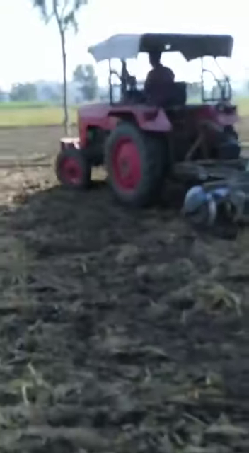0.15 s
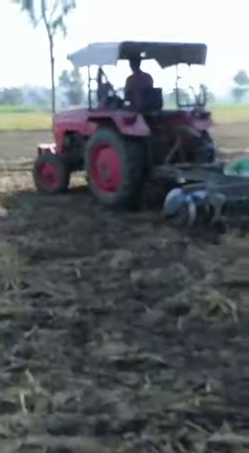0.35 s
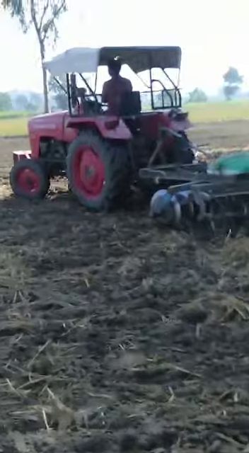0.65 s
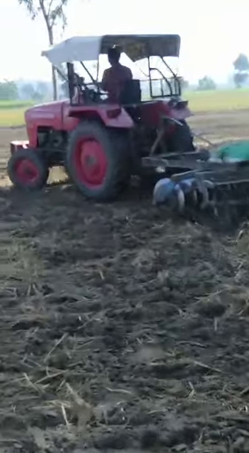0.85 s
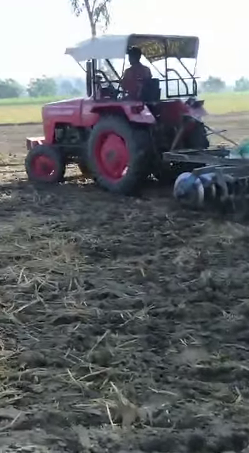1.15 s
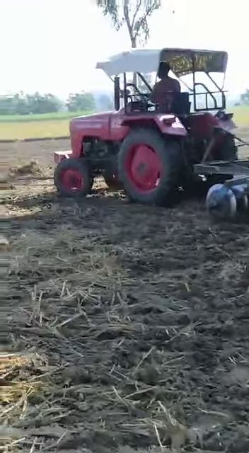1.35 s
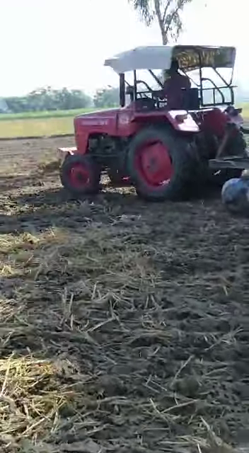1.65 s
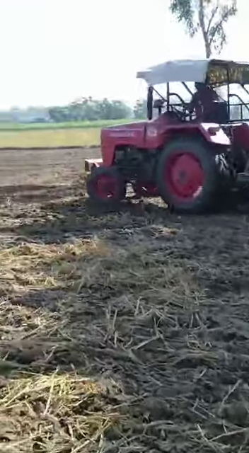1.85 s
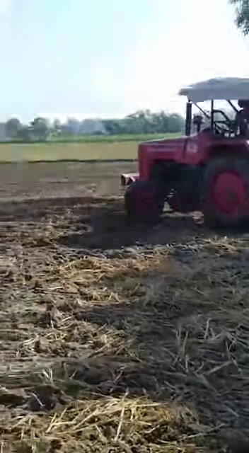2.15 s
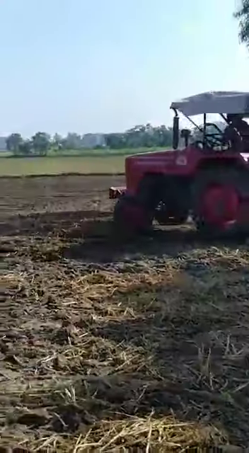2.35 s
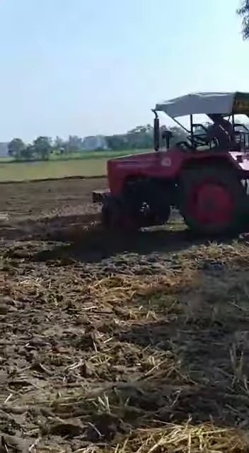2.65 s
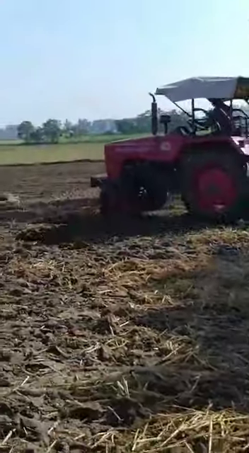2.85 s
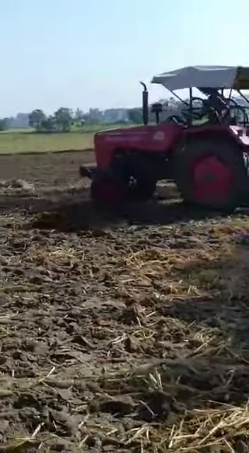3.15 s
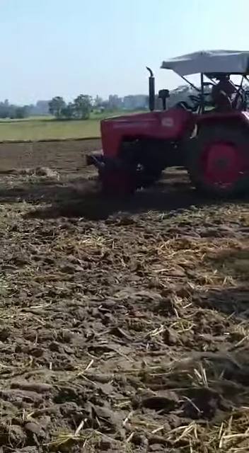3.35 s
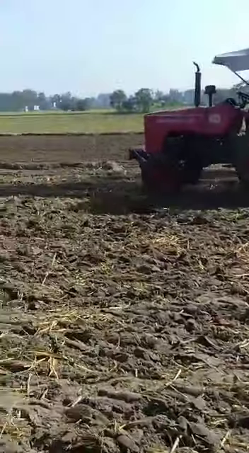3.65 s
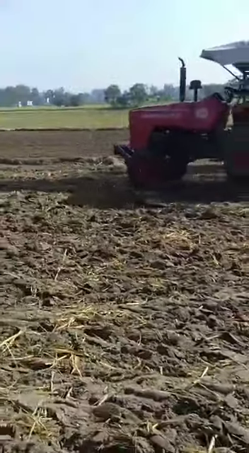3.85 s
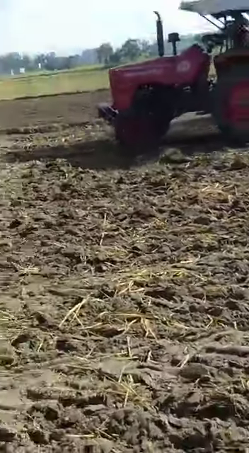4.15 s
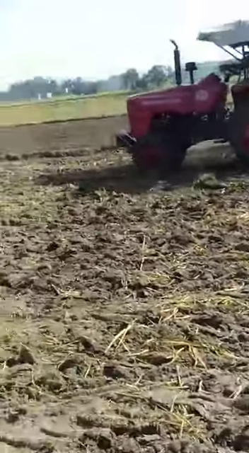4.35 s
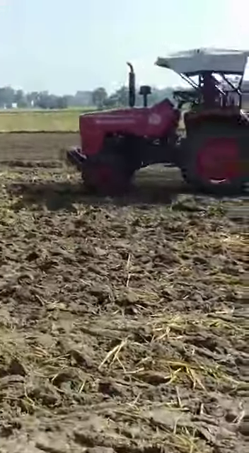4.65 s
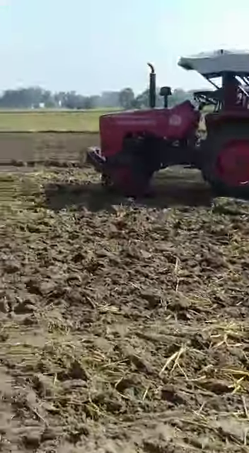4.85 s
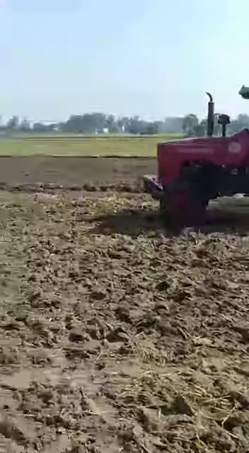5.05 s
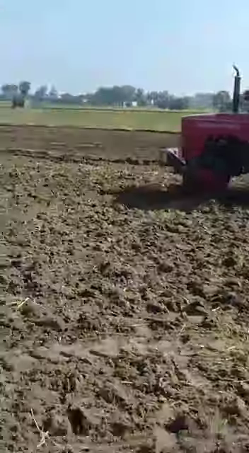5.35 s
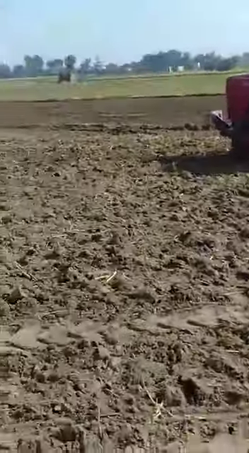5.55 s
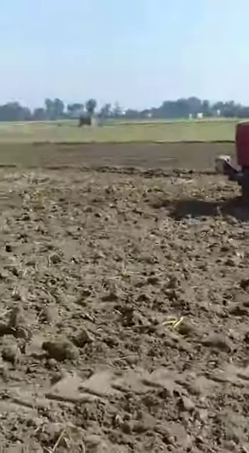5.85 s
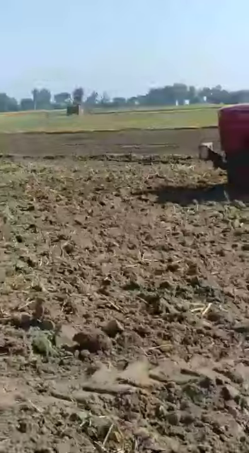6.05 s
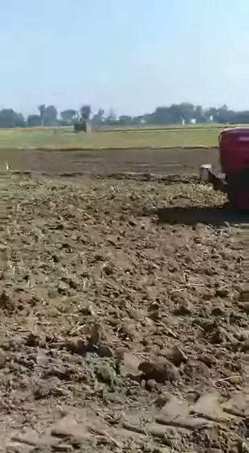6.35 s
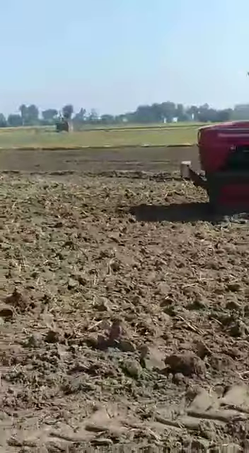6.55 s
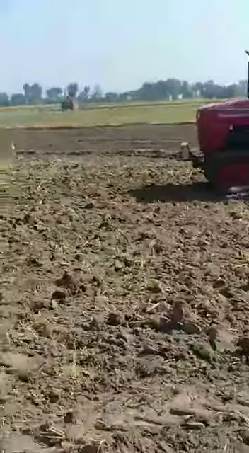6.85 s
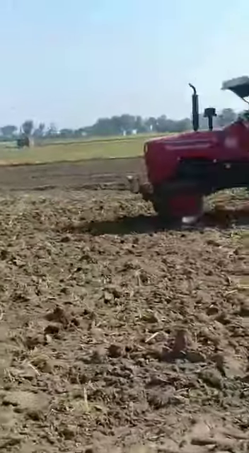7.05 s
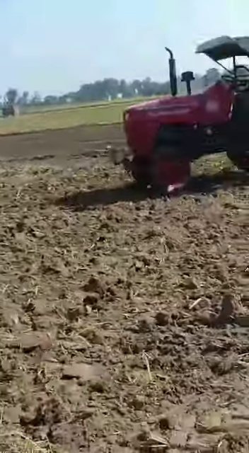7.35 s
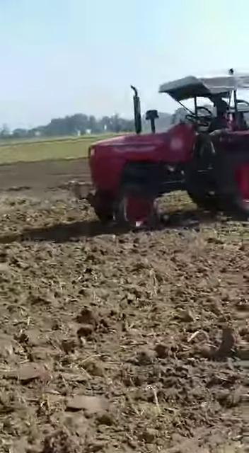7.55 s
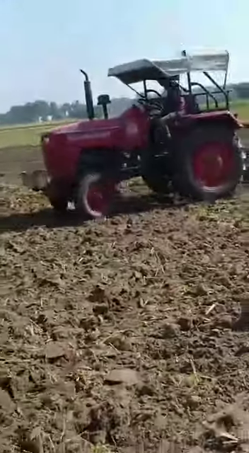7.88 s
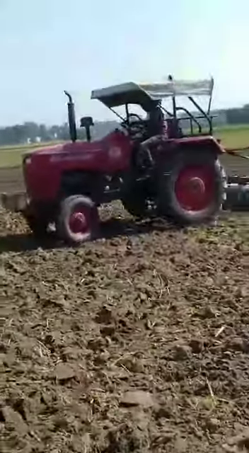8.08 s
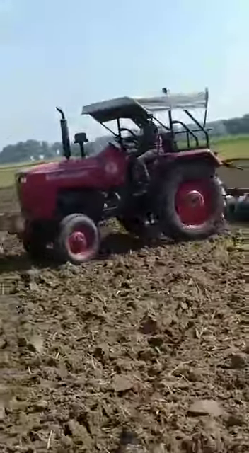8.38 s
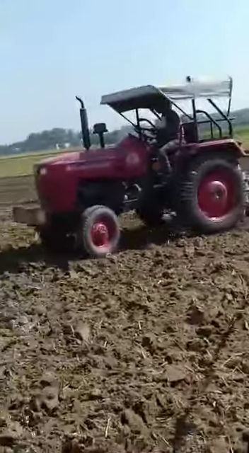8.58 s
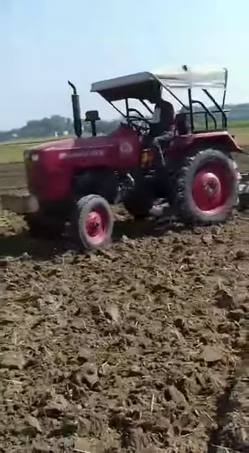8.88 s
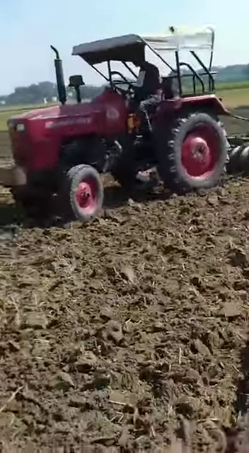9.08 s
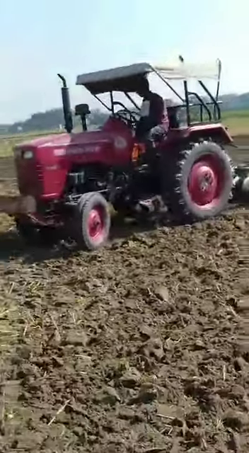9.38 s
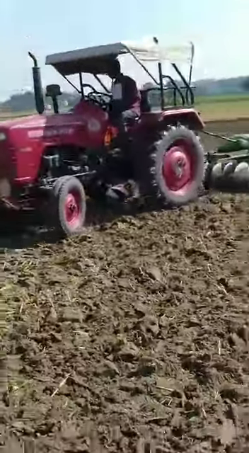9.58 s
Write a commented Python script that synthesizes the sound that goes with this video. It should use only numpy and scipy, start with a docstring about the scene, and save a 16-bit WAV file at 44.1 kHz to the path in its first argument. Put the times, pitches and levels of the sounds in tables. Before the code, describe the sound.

The even chugging and knocking of a tractor's diesel engine fills an open field, with ticking, ringing panels and a whine that comes and goes. In the first three seconds a towed harrow scrapes through the earth and clinks once. Past the middle, an airy hiss swells and a soft gust bumps the microphone, then the tractor gets louder as it draws near.

```python
"""A throbbing, knocking diesel tractor slowly comes closer, dragging a disc harrow over a tilled field.
Four cylinders fire in turn: the exhaust hums and puffs, the block knocks, its panels ring, injectors tick.
The timing gear whines, the fan hums and hisses, and narrow bands of the rattle swell and fade.
An echo off the soil combs the block and the ticking as the tractor moves; a thin hiss sits at the very top.
Early on the discs rasp and clink; light wind touches the microphone."""
import sys
import numpy as np
from scipy import signal
from scipy.fft import rfft, irfft
from scipy.io import wavfile

SR = 44100
rng = np.random.default_rng(int(sys.argv[2]) if len(sys.argv) > 2 else 0)


def unload_audio(sound):
    """Save the sound as a 16-bit wav file, at the path given as the first command line argument."""
    columns = np.transpose(np.atleast_2d(sound))
    # keep every value between -1 and 1, then stretch to whole-number steps
    steps = np.round(np.clip(columns, -1, 1) * 32767)
    wavfile.write(sys.argv[1], SR, steps.astype(np.int16))


N = 428652
TIME = np.arange(N) / SR
FREQS = np.arange(N // 2 + 1) * SR / N
# treble faders: (time [s], injector tick [dB], top hiss [dB])
TREBLE_LEVELS = [(0, -39.5, -48), (1.2, -38.5, -44.5), (1.7, -39.5, -48), (2.8, -37, -48), (3.45, -36, -46),
                 (4.2, -39.5, -49), (5.0, -37.5, -48.5), (5.65, -43, -47), (6.2, -42.5, -46),
                 (6.9, -41, -46.5), (7.4, -39, -49.5), (8.0, -34.5, -44.5), (8.7, -34, -46),
                 (9.3, -33.5, -41), (9.72, -32.5, -41)]


def engine_block(cycle):
    """Every firing shakes a growl from the block, knocks in the head and rings the panels."""
    # the block's fader: (time [s], level [dB], knock against the block [dB])
    levels = [(0.0, -25.5, -3), (1.0, -25.5, -4), (1.9, -25, -4.5), (2.15, -26, -5.5), (2.7, -24, -5),
              (3.4, -24.5, -5), (4.2, -25.5, -3), (5.2, -24.5, -4.5), (5.6, -26, -4.7), (6.5, -24, -6.5),
              (7.1, -25.5, -4), (8.0, -23.5, -3.5), (8.95, -22.5, -3), (9.3, -18.5, -4), (9.72, -20, -4.5)]
    # midrange growl: (frequency [Hz], relative level [dB])
    growl_eq = [(260, -12.5), (380, -7.5), (470, -2.5), (560, -3.5), (700, -1.5), (850, -2.1), (1080, -4),
                (1300, -3.5), (1550, -8), (1800, -42)]
    # hard, bright knock: (frequency [Hz], relative level [dB])
    knock_eq = [(1350.0, -27), (1650.0, -7), (1900.0, -2.5), (2250.0, -0.2), (2500.0, 0.2), (2750.0, -2),
                (3000.0, -3.6), (3250.0, -10.5), (3700.0, -43.2)]
    block_db, knock_db = in_time(levels)
    growl_db = -5.5  # against the block
    blows = firing_blows(cycle, decay=0.15, rise=0.018, uneven_db=1.0)
    growl = rattle(cycle, repeat=0.36, slack=0.00035) * pulsing(cycle, blows, base=2.2, lope=.1)
    knock = rattle(cycle, repeat=0.42, slack=0.00022) * pulsing(cycle, blows, base=.85)
    knock *= from_db(1.24 * drift(440))
    ring = panels(rattle(cycle, repeat=0.5, slack=0.000098)) * pulsing(cycle, blows, base=2.4)
    body = from_db(growl_db) * coloured(growl, growl_eq) + from_db(knock_db) * coloured(knock, knock_eq)
    return from_db(block_db) * over_soil(body + ring, echo=1.04, dull_hz=2220)


def panels(drive):
    """Bonnet, sump, side plates and rocker cover ring, each radiating best to the side it faces."""
    # panel resonances: (pitch [Hz], width [Hz], level against the block from each of six sides [dB])
    modes = [(435.0, 70.0, -12.0, -17.0, -30.0, -30.0, -17.0, -10.0),
             (592.0, 84.0, -13.0, -19.5, -11.0, -12.0, -16.0, -18.5),
             (699.0, 79.0, -19.0, -15.0, -12.0, -17.0, -14.0, -17.5),
             (778.0, 92.0, -15.5, -14.5, -10.0, -14.5, -17.5, -22.0),
             (905.0, 109.0, -14.0, -13.0, -13.0, -8.5, -15.5, -21.0),
             (1036.0, 102.0, -25.0, -18.0, -13.5, -9.5, -14.5, -19.5),
             (1135.0, 88.0, -19.5, -14.0, -12.5, -8.5, -16.0, -16.0),
             (1230.0, 100.0, -14.0, -14.0, -16.5, -16.5, -18.5, -17.0),
             (1353.0, 97.0, -10.0, -11.0, -17.5, -17.5, -22.0, -16.0),
             (1460.0, 100.0, -12.5, -19.5, -16.5, -16.0, -21.0, -18.5),
             (1594.0, 105.0, -16.5, -14.5, -13.0, -20.5, -23.0, -17.0),
             (1746.0, 128.0, -11.0, -12.5, -15.5, -17.0, -21.5, -13.0),
             (1890.0, 111.0, -14.0, -20.0, -12.5, -13.0, -14.0, -12.5),
             (1999.0, 93.0, -14.0, -12.0, -19.5, -18.0, -14.5, -14.0),
             (2119.0, 107.0, -8.0, -13.5, -19.5, -21.5, -15.5, -11.0),
             (2256.0, 134.0, -9.5, -10.0, -9.5, -8.0, -12.5, -16.0),
             (2385.0, 123.0, -11.0, -19.0, -12.0, -11.5, -15.5, -20.0),
             (2534.0, 119.0, -20.0, -13.0, -16.0, -16.0, -15.0, -14.5),
             (2654.0, 121.0, -13.0, -14.0, -13.5, -12.5, -16.5, -17.5),
             (2945.0, 116.0, -22.0, -21.0, -22.0, -23.5, -19.5, -22.0)]
    return sum(facing(side_db) * resonance(drive, hz, width_hz) for hz, width_hz, *side_db in modes)


def exhaust(cycle):
    """The pipe hums with the firings, throbs with the unequal cylinders and puffs turbulent gas."""
    # hum at the firing rate: (time [s], level [dB])
    firing_hum = [(0, -33), (.6, -39.5), (2.8, -35.5), (4.3, -40.5), (5.2, -36.5), (6.0, -40), (6.7, -34),
                  (7.3, -43), (7.7, -37), (8.7, -35.5), (8.95, -44), (9.3, -29), (9.72, -44)]
    # its overtones: (time [s], second harmonic [dB], third harmonic [dB])
    overtones = [(0, -33, -44), (1.0, -31.5, -40.5), (2.0, -30, -48), (2.6, -29.5, -36), (4.0, -32.5, -36),
                 (5.1, -35.5, -38), (6.7, -44.5, -40.5), (8.0, -50, -45), (8.7, -49, -46.5),
                 (9.72, -55, -41.5)]
    # uneven throb: (order [multiple of the cycle rate], level from each of six sides [dB])
    throb_orders = [(3, -73, -66, -57, -54, -43, -53), (5, -46, -51, -62, -46, -47, -36),
                    (6, -38, -45, -41, -45, -40, -39), (7, -46, -58, -38, -35.5, -41, -44),
                    (9, -42, -39, -46, -46, -42, -54), (11, -46, -40.5, -59, -50, -65, -51),
                    (13, -47, -50, -48, -50, -68, -64), (16, -46, -69, -58, -60, -53.5, -45.5)]
    # rumble of the gas: (frequency [Hz], relative level [dB])
    gas_eq = [(25, -35), (55, -6), (90, -33), (140, 5.5), (200, -1.5), (260, -9), (400, -14)]
    dispersion_turns, gas_db = 0.0373, -38
    first_db, = in_time(firing_hum)
    second_db, third_db = in_time(overtones)
    angle = cycle - .05 + 0.0033 * drift(23)

    def through_pipe(order):
        """Phase of one order in turns: the pipe lets the higher ones linger longest."""
        return order * angle - dispersion_turns * (order - 7) ** 2

    hum = from_db(first_db) * tone(through_pipe(4), flutter_db=2.0, wander_rad=.05)
    hum += from_db(second_db) * tone(through_pipe(8), flutter_db=-0.5, wander_rad=0.075)
    hum += from_db(third_db) * tone(through_pipe(12), flutter_db=1.2, wander_rad=0.15)
    throb = sum(facing(side_db) * np.sqrt(2) * np.cos(2 * np.pi * through_pipe(order))
                for order, *side_db in throb_orders)
    throb *= from_db(2.3 * drift(39))
    puffs = 0.82 + firing_blows(cycle, decay=0.2, rise=0.006, uneven_db=-1.5)
    return hum + throb + from_db(gas_db) * coloured(puffs * rng.standard_normal(N), gas_eq)


def injectors(cycle, snaps):
    """An injector snaps at each firing with a crisp tick."""
    # crisp tick: (frequency [Hz], relative level [dB])
    tick_eq = [(2700, -2.5), (3300, 0), (4000, -0.5), (5000, 0), (6300, -6), (7300, -12), (9000, -18),
               (11000, -19), (13000, -29)]
    tick_db, _ = in_time(TREBLE_LEVELS)
    ticks = rattle(cycle, repeat=0.25, slack=0.000098) * pulsing(cycle, snaps, base=.9, lope=.08)
    ticks *= from_db(0.9 * drift(420))
    ticks = off_bodywork(ticks, strength=.24, count=4)
    return from_db(tick_db) * over_soil(coloured(ticks, tick_eq), echo=0.38, dull_hz=9000)


def timing_gear(cycle):
    """Meshing teeth whine, 30 to a cycle; the gear's run-out wobbles the pitch."""
    # whine at the tooth rate: (time [s], level [dB])
    whine_levels = [(0.07, -32.0), (0.28, -32.5), (0.44, -29.5), (0.74, -34.0), (1.11, -32.0), (1.3, -38.5),
                    (1.49, -35.5), (2.0, -47.0), (2.41, -40.0), (2.88, -44.0), (3.16, -36.0), (4.34, -32.5),
                    (4.76, -37.0), (5.04, -47.0), (5.34, -38.0), (5.55, -46.5), (5.97, -47.0),
                    (6.08, -41.0), (6.41, -34.0), (6.64, -34.0), (6.87, -40.5), (6.99, -35.5),
                    (7.38, -35.0), (7.64, -44.0), (8.06, -35.0), (8.43, -41.0), (8.66, -32.5),
                    (8.82, -38.0), (9.22, -29.0), (9.64, -33.0)]
    # the octave above: (time [s], level [dB])
    octave_levels = [(0, -60), (2.4, -55), (4.2, -47), (4.8, -37.5), (5.4, -40), (5.8, -52), (6.6, -46),
                     (8.4, -51), (8.9, -38.5), (9.35, -36), (9.6, -48)]
    runout_teeth = 0.013
    teeth = 30 * cycle + runout_teeth * np.sin(2 * np.pi * cycle)
    whine = from_db(in_time(whine_levels)[0]) * tone(teeth, flutter_db=1.4, wander_rad=.25)
    octave = from_db(in_time(octave_levels)[0]) * tone(2 * teeth, flutter_db=2.8, wander_rad=0.45)
    return whine + octave


def brief_resonances(cycle):
    """Narrow bands of the engine's rattle swell and fade, each at its own pitch."""
    # swelling bands: (time [s], pitch [Hz], peak level [dB], half length [s], width [Hz])
    bands = [(0.11, 2130.0, -34.9, 0.21, 61.0), (1.76, 2399.0, -33.1, 0.28, 64.0),
             (2.7, 2678.0, -33.3, 0.29, 91.0), (2.87, 1234.0, -36.8, 0.5, 55.0),
             (2.94, 2119.0, -29.4, 0.27, 117.0), (3.0, 1373.0, -39.7, 0.51, 39.0),
             (3.46, 843.0, -36.9, 0.23, 91.0), (3.51, 1452.0, -38.1, 0.18, 93.0),
             (3.83, 2179.0, -36.6, 0.2, 91.0), (3.92, 2658.0, -33.5, 0.22, 94.0),
             (4.1, 632.0, -35.9, 0.5, 44.0), (4.71, 1747.0, -38.2, 0.31, 87.0),
             (4.81, 2526.0, -38.0, 0.16, 48.0), (5.91, 1483.0, -37.2, 0.18, 84.0),
             (6.46, 2247.0, -36.6, 0.23, 63.0), (7.99, 2434.0, -32.3, 0.34, 70.0), (8.5, 690, -33, 0.4, 70),
             (9.4, 690, -29, 0.25, 60), (9.55, 1765, -30, 0.2, 60)]
    drive = rattle(cycle, repeat=0.31, slack=0.0001)
    return sum(from_db(db) * swell(centre_s, half_s) * resonance(drive, hz, width_hz)
               for centre_s, hz, db, half_s, width_hz in bands)


def harrow_clinks():
    """Loose iron knocks together and rings as a disc rides over a clod."""
    # a quick double hit: (time [s], peak level [dB])
    hits = [(1.9455, -8), (1.956, -17)]
    # ring of the harrow frame: (pitch [Hz], level against the hit [dB], time to fall 60 dB [s])
    modes = [(2470, 0, .055), (2590, -7, .04), (5150, -23, .04), (7800, -26, .055)]
    attack_s = 0.0015
    out = np.zeros(N)
    for start_s, peak_db in hits:
        age = np.maximum(TIME - start_s, 0)
        attack = 1 - np.exp(-age / attack_s)
        for hz, db, t60 in modes:
            fall_db = 60 * np.minimum(age / t60, 2)
            out += attack * from_db(peak_db + db - fall_db) * np.sin(2 * np.pi * hz * age)
    return out


def disc_rasp():
    """Gritty soil rasps along the discs, swelling and fading with each hard patch."""
    # hard patches: (time [s], peak level [dB], half length [s])
    patches = [(1.238, -30.5, 0.44), (1.875, -30, 0.82), (2.698, -28.5, 0.28)]
    # grinding steel: (frequency [Hz], relative level [dB])
    disc_eq = [(1300.0, -9.5), (1550.0, -7.5), (1850.0, -0.5), (2050.0, -8.5), (2280.0, 2), (2500.0, -18),
               (2900.0, -17)]
    level = sum(from_db(db) * swell(centre_s, half_s) for centre_s, db, half_s in patches)
    grit = rng.standard_normal(N) * from_db(2.0 * drift(97))
    return level * coloured(grit, disc_eq)


def fan_hum(cycle):
    """Geared up by its belt, the fan hums and beats against the exhaust."""
    # fan tones: (order [multiple of its turning rate], level [dB])
    partials = [(1, -53), (3, -40), (4, -41), (7, -57.5)]
    turns = 2.524 * cycle
    return sum(from_db(db) * tone(order * turns, flutter_db=2.0, wander_rad=0.16)
               for order, db in partials)


def cooling_air():
    """Turbulent air flickers through the fan, hissing loudest while it faces the listener."""
    # bright hiss: (frequency [Hz], relative level [dB])
    hiss_eq = [(3500, 3), (5500, 2), (6200, 11.5), (6800, 7), (7600, 1), (9500, -25), (12500, -12)]
    level_db = -47.5 + 7.5 * swell(centre_s=6.16, half_s=1.26) + 2.0 * drift(94)
    return from_db(level_db) * coloured(rng.standard_normal(N), hiss_eq)


def top_hiss(snaps):
    """A thin, airy hiss at the very top, pulsing faintly with the firings."""
    # airy hiss: (frequency [Hz], relative level [dB])
    hiss_eq = [(9000, -30), (12000, -11), (13300, -6.5), (14500, -2), (15700, 0.5)]
    _, hiss_db = in_time(TREBLE_LEVELS)
    hiss = rng.standard_normal(N) * (4.5 + snaps) * from_db(drift(430))
    return from_db(hiss_db) * coloured(hiss, hiss_eq)


def wind():
    """A steadily freshening breeze buffets the microphone, once with a dull gust."""
    # low buffeting: (frequency [Hz], relative level [dB])
    breeze_eq = [(8, -9), (35, 4), (60, 2), (95, 11), (150, -1), (300, -18.5)]
    # dull gust: (frequency [Hz], relative level [dB])
    gust_eq = [(50, -11), (95, -4), (140, -6)]
    breeze_db, rise_db_per_s, gust_db = -45, 0.95, -26.5
    breeze = from_db(breeze_db + rise_db_per_s * TIME) * coloured(rng.standard_normal(N), breeze_eq)
    gust = swell(centre_s=6.02, half_s=.1) * coloured(rng.standard_normal(N), gust_eq)
    return breeze + from_db(gust_db) * gust


def over_soil(x, echo, dull_hz):
    """Soft soil returns an inverted, duller, slightly late copy that cuts moving notches."""
    # ground bounce: (time [s], lag [ms], relative strength [0-1])
    bounce = [(0.0, 1.9, 0.53), (0.9, 1.86, 0.51), (1.6, 1.72, 0.49), (2.2, 1.88, 0.57), (2.8, 1.89, 0.61),
              (3.2, 1.83, 0.62), (3.55, 1.82, 0.57), (3.9, 1.98, 0.52), (4.3, 2.16, 0.55),
              (4.8, 2.11, 0.58), (5.2, 2.1, 0.56), (5.6, 2.12, 0.46), (6.05, 2.03, 0.51), (6.4, 2.06, 0.49),
              (7.5, 2.13, 0.43), (8.5, 2.08, 0.57), (9.1, 2.01, 0.61), (9.4, 1.92, 0.58),
              (9.72, 1.74, 0.58)]
    lag_ms, strength = in_time(bounce)
    soft_soil = np.exp(-1.4j) / (1 + (FREQS / dull_hz) ** 4)  # phase shift and treble loss
    reflected = np.interp(TIME - lag_ms / 1000, TIME, irfft(rfft(x) * soft_soil, N))
    return x - np.clip(echo * strength, 0, .95) * reflected


def off_bodywork(x, strength, count):
    """Short echoes off bonnet, wheels and canopy slide as the tractor moves and ripple the treble."""
    lags_s, slide_s = np.geomspace(.0012, .0065, count), .00016
    echoes = sum(np.interp(TIME - lag - slide_s * drift(0.58), TIME, x) for lag in lags_s)
    return rms_one(x + strength * echoes)


def firing_blows(cycle, decay, rise, uneven_db):
    """Envelope of the firings, each with its own strength; rise and decay are shares of a cycle."""
    # the four firings: (place in the cycle [0-1], accent [dB])
    firings = [(0.125, 2.5), (0.375, 0.3), (0.6, -0.5), (.87, 2)]
    out = 0
    for place, db in firings:
        number, age = np.divmod(cycle - place + 2, 1)
        strength = from_db(db + uneven_db * rng.standard_normal(400))[number.astype(int)]
        out = out + strength * np.exp(-age / decay) * (1 - np.exp(-age / rise))
    return rms_one(out)


def pulsing(cycle, blows, base, lope=0):
    """A steady base plus the firings; lope swells it once a cycle with the hardest cylinder."""
    return rms_one((base + blows) * (1 + lope * np.cos(2 * np.pi * (cycle - .1))))


def rattle(cycle, repeat, slack):
    """Dense contacts: a share recurs every cycle in a slowly morphing pattern, the rest is chance."""
    patterns = rng.standard_normal((6, 2400))
    grid = np.linspace(0, 1, patterns.shape[1])
    angle = (cycle + slack * drift(35)) % 1
    morph = TIME / TIME[-1] * (len(patterns) - 1)
    recurring = sum(np.sqrt(np.maximum(0, 1 - abs(morph - k))) * np.interp(angle, grid, pattern)
                    for k, pattern in enumerate(patterns))
    return np.sqrt(repeat) * recurring + np.sqrt(1 - repeat) * rng.standard_normal(N)


def facing(side_db):
    """Gain towards the listener: the powers radiated to the two nearest sides blend."""
    # side turned to the listener: (time [s], side [0 rear quarter, 2 flank, 5 front quarter])
    sides = [(0.6, 0), (2.7, 1), (4.5, 2), (6.3, 3), (8.4, 4), (9.55, 5)]
    side, = in_time(sides)
    return np.sqrt(np.interp(side, np.arange(len(side_db)), from_db(side_db) ** 2))


def resonance(drive, hz, width_hz):
    """One narrow ringing band; rms 1."""
    band = signal.butter(2, [hz - width_hz / 2, hz + width_hz / 2], "band", fs=SR, output="sos")
    return rms_one(signal.sosfilt(band, drive))


def tone(turns, flutter_db, wander_rad):
    """A sine near rms 1 that flutters in level and phase."""
    phase = 2 * np.pi * turns + wander_rad * drift(42)
    return np.sqrt(2) * np.cos(phase) * from_db(flutter_db * drift(17.5))


def coloured(x, eq):
    """Shape with an EQ curve that falls steeply beyond its ends; rms 1."""
    hz, db = np.transpose(eq)
    f = np.maximum(FREQS, 1)
    skirts = np.minimum(1, np.minimum(f / hz[0], hz[-1] / f)) ** 4
    gain = from_db(np.interp(np.log(f), np.log(hz), db))
    return rms_one(irfft(rfft(x) * skirts * gain, N))


def swell(centre_s, half_s):
    """A bell-shaped rise and fall of height 1."""
    return np.exp(-((TIME - centre_s) / half_s) ** 2)


def drift(rate_hz):
    """Smooth random motion, mostly slower than the given rate; rms 1."""
    return rms_one(irfft(rfft(rng.standard_normal(N)) / (1 + (FREQS / rate_hz) ** 2) ** 2, N))


def in_time(rows):
    """Each column of an automation curve at every sample."""
    times, *columns = np.transpose(rows)
    return [np.interp(TIME, times, column) for column in columns]


def from_db(db):
    """Decibels to gain."""
    return 10 ** (np.asarray(db) / 20)


def rms_one(x):
    """Scale to unit rms."""
    return x / np.sqrt(np.mean(x ** 2) + 1e-20)


def scene():
    """Tractor, harrow and wind in mono; the four-stroke cycle times all the engine's parts."""
    # governed crankshaft: (time [s], speed [turns/s])
    crank_speed = [(0.0, 33.62), (0.25, 33.79), (0.7, 33.45), (1.6, 34.19), (2.2, 34.95), (2.8, 34.95),
                   (3.3, 35.36), (4.0, 35.23), (4.6, 35.41), (6.05, 35.3), (6.5, 34.86), (7.2, 35.61),
                   (7.55, 35.06), (8.0, 35.22), (8.6, 35.57), (9.25, 35.09), (9.5, 35.65), (9.72, 35.19)]
    cycle = np.cumsum(in_time(crank_speed)[0]) / SR / 2  # two turns to a cycle
    engine = exhaust(cycle) + engine_block(cycle)
    snaps = firing_blows(cycle, decay=0.17, rise=0.007, uneven_db=1.5)
    treble = injectors(cycle, snaps) + top_hiss(snaps)
    tractor = engine + treble + timing_gear(cycle) + brief_resonances(cycle)
    tractor += fan_hum(cycle) + cooling_air()
    return (tractor + harrow_clinks() + disc_rasp() + wind())[None]


def record(dry):
    """A steep low-pass trims the very top."""
    cutoff_hz = 15750
    return signal.sosfilt(signal.ellip(12, .1, 90, cutoff_hz, fs=SR, output="sos"), dry)


dry = scene()
out = record(dry)
unload_audio(out)
```